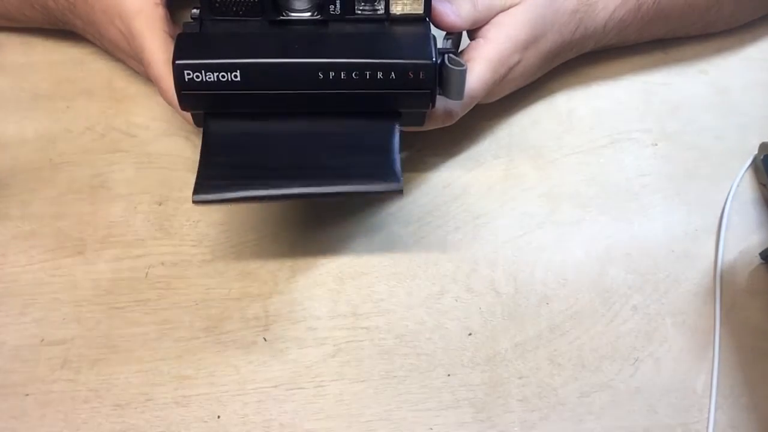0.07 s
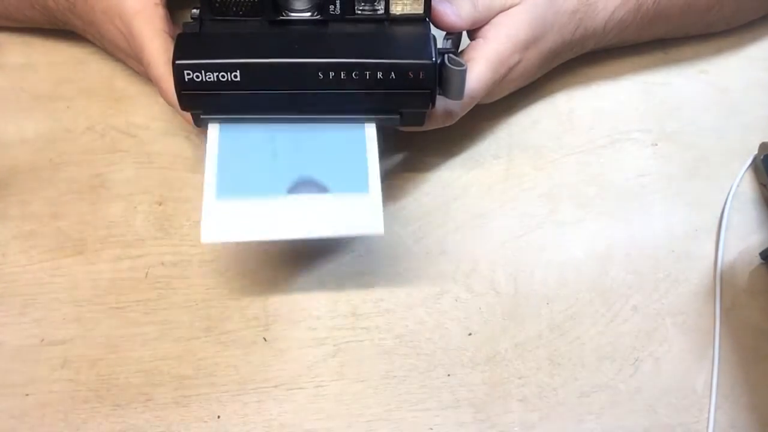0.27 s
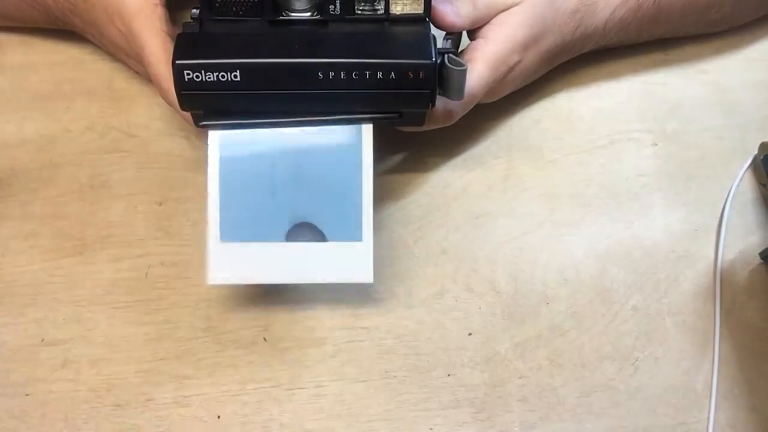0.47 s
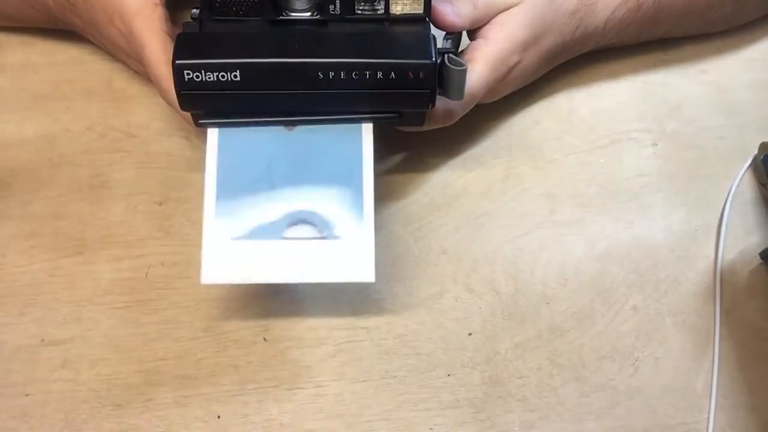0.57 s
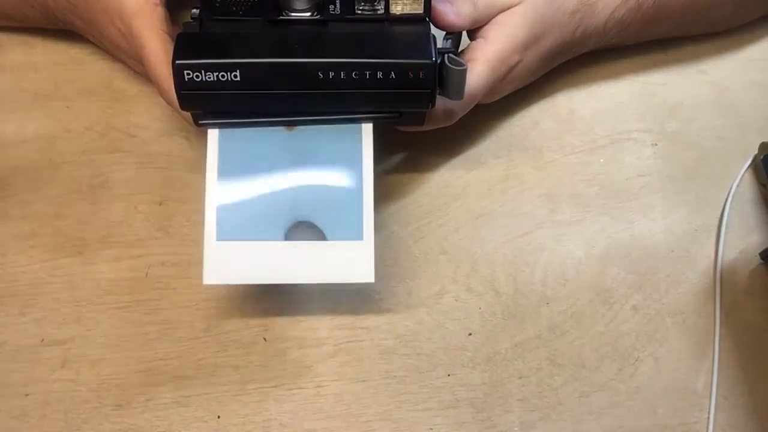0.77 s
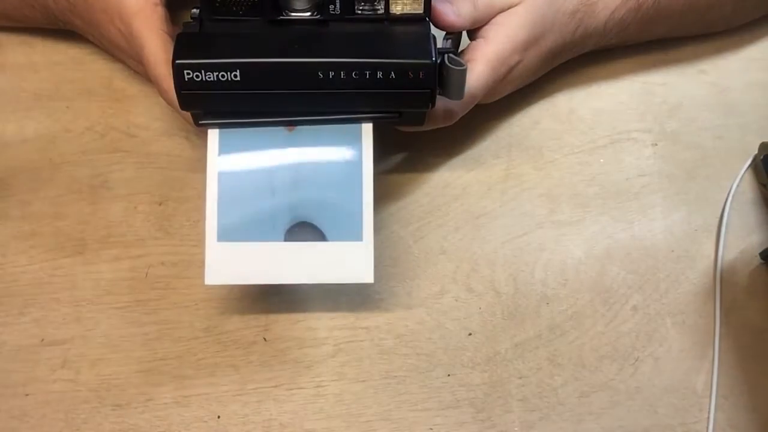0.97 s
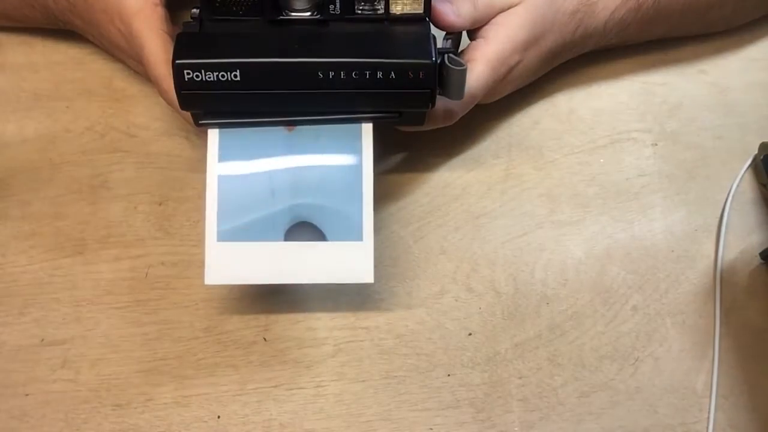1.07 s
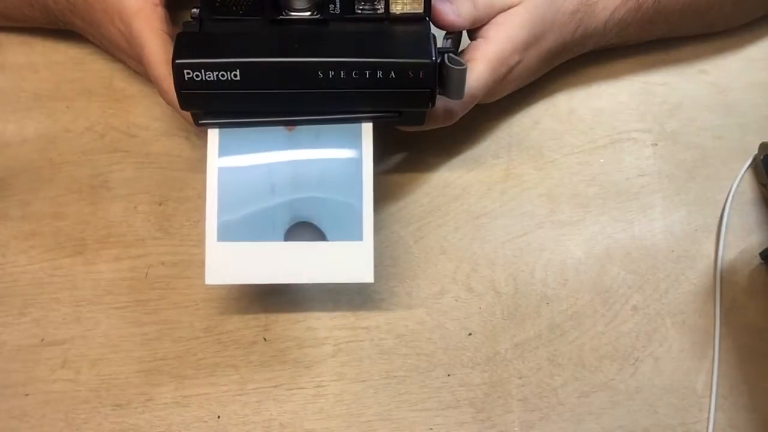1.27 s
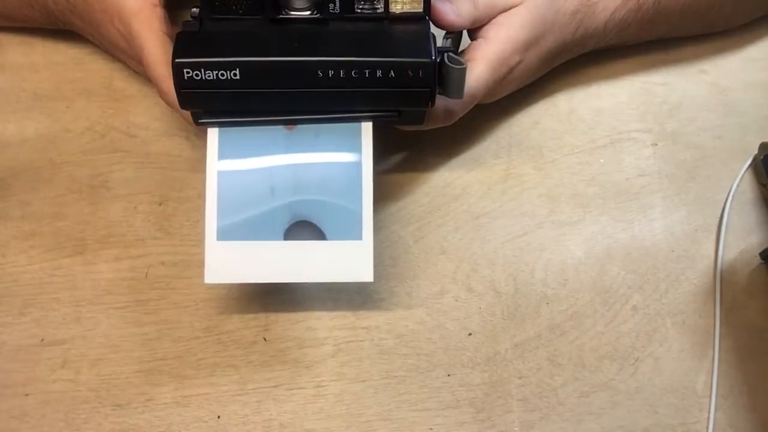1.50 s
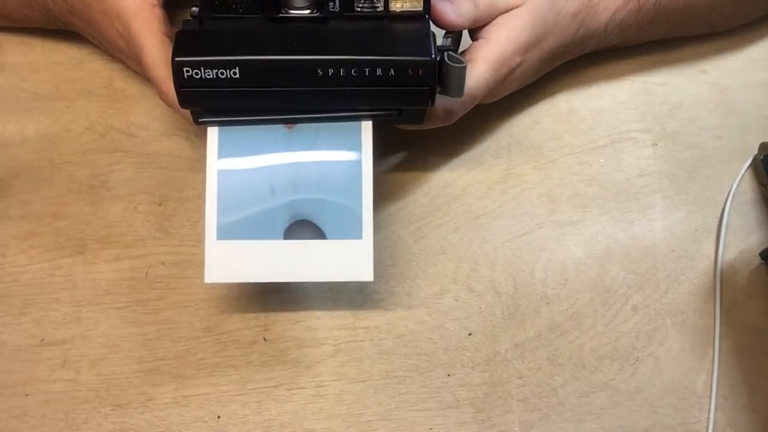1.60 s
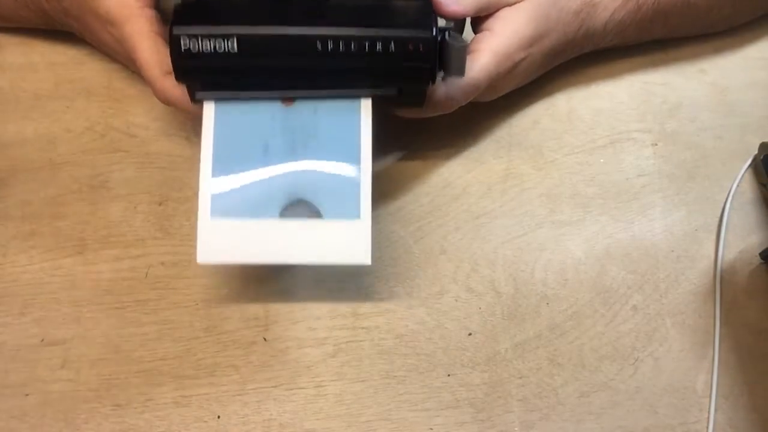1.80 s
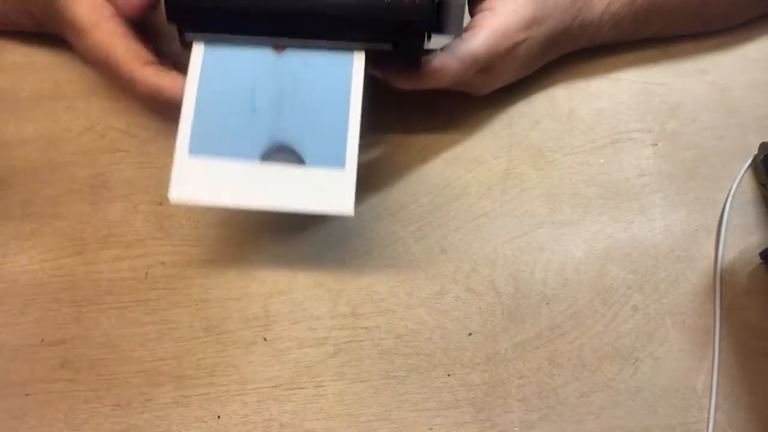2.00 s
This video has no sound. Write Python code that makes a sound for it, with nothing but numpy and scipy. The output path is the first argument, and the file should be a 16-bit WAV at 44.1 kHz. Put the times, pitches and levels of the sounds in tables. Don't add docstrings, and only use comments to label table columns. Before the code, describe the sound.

Instant camera ejecting a print: gritty gear whir, sharp plastic snap, lighter rattle, quick stop

```python
import sys
import numpy as np
from scipy import signal
from scipy.fft import rfft, irfft
from scipy.io import wavfile
from scipy.ndimage import map_coordinates

SR = 44100
rng = np.random.default_rng(int(sys.argv[2]) if len(sys.argv) > 2 else 0)


def materialize(psi):
    bounded = np.clip(np.atleast_2d(psi).T, -1, 1)
    quanta = np.round(bounded * 32767).astype(np.int16)
    wavfile.write(sys.argv[1], SR, quanta)


def voltage_ratio(decibels):
    exponent = np.asarray(decibels, float) / 20
    return 10 ** exponent


N = 90404
TIME = np.arange(N) / SR
HOUSING_HZ = 420


def unit(x):
    return x / np.sqrt(np.mean(x ** 2) + 1e-20)


def along(points, hz):
    f, v = np.transpose(points)
    return np.interp(np.log(hz + 1), np.log(f + 1), v)


def wobble(rate):
    return map_coordinates(rng.standard_normal(int(N * rate / SR) + 4), [TIME * rate])


def coloured(x, spectrum, peaks=()):
    hz = np.fft.rfftfreq(4096, 1 / SR)
    db = along(spectrum, hz)
    for centre, width, height in peaks:
        db = db + height / (1 + (2 * (hz - centre) / width) ** 2)
    cepstrum = irfft(np.log(voltage_ratio(np.maximum(db, -90))))
    cepstrum[1:2048] *= 2
    cepstrum[2049:] = 0
    response = irfft(np.exp(rfft(cepstrum)))
    return signal.fftconvolve(x, response / np.linalg.norm(response))[:len(x)]


def add(out, s, x):
    start = round(s * SR)
    out[start:][:len(x)] += x[:len(out) - start]


def sine(hz, t):
    return np.sin(2 * np.pi * hz * t)


def chatter(spiky_db, lumpy_db, rate):
    return unit(rng.standard_normal(N) * voltage_ratio(spiky_db * wobble(2500) + lumpy_db * wobble(rate)))


def order_tones(orders, turns, rough):
    out = np.zeros(N)
    for multiple, db in orders:
        level = np.sqrt(2) * voltage_ratio(db + 4 * rough * wobble(18))
        out += level * np.sin(2 * np.pi * multiple * turns + rough * wobble(40))
    return out


def loaded_grind(speed, turns):
    # centre in Hz, dB per Hz
    grind = [(160, -50), (280, -19), (524, -9), (653, -18), (1070, -6), (2060, -13), (3730, -12.5),
             (9310, -13.5), (16000, -23)]
    # centre in Hz, width in Hz, height in dB
    shell = [(1180, 250, 3.5), (1640, 99, 7.5), (3660, 220, 7.5), (5100, 150, 2), (6400, 250, 7),
             (8640, 200, 1.5)]
    # multiple of gear speed, dB over the grind
    orders = [(5, -33), (10, -20), (14, -13), (15, -17), (20, -17), (28, -9), (32, -13), (34.5, -15),
              (41, -14), (45, -16)]
    # multiple of gear speed, dB over the grind
    mesh_orders = [(102, -9.5), (136, -14), (170, -18)]
    in_tune = np.exp(-((speed - 37) / 2.3) ** 2)
    whine = in_tune * order_tones(mesh_orders, turns, .9) * voltage_ratio(3 * wobble(110))
    teeth = coloured(chatter(spiky_db=2, lumpy_db=1.2, rate=150), grind, shell)
    return teeth + (1 + in_tune) / 2 * order_tones(orders, turns, .5) + whine


def free_rattle(speed, turns):
    # centre in Hz, dB per Hz
    rattle = [(150, -59.5), (290, -20.5), (400, -15.5), (800, -12.5), (2300, -15.5), (4400, -14.5),
              (9600, -11.5), (16000, -22)]
    # centre in Hz, width in Hz, height in dB
    shell = [(885, 67, 4.5), (1075, 47, 7), (1280, 51, 4), (1400, 1500, 11), (1890, 83, 8.1),
             (2854, 410, 12), (3316, 570, 5), (3720, 130, 10), (5336, 300, 3), (6647, 1500, 6)]
    # multiple of gear speed, dB over the rattle at top speed
    orders = [(19.6, -9), (23.2, -12), (27, -16), (30, -13), (35, -14), (40, -10), (60, -17), (67, -16),
              (80, -18)]
    hum_order, hum_db = 10, -30
    detune_hz = hum_order * speed - HOUSING_HZ
    resonance_db = 18 / (1 + (2 * detune_hz / 105) ** 4)
    brake_db = 6 * np.clip((TIME - .603) / .01, 0, 1)
    hum = voltage_ratio(brake_db + resonance_db) * order_tones([(hum_order, hum_db)], turns, .5)
    teeth = coloured(chatter(spiky_db=2.2, lumpy_db=1.6, rate=90), rattle, shell)
    fade_db = 1.7 * (speed - 48)
    return teeth + voltage_ratio(fade_db) * order_tones(orders, turns, 1.3) + hum


def gears():
    # time in seconds, loaded grind in dB, free rattle in dB
    motor = [(0, -40.5, -59.5), (0.198, -39.5, -61), (0.269, -38.5, -52.5), (.35, -36, -52),
             (0.412, -42, -50.5), (0.445, -43.5, -47), (0.467, -43, -39), (.485, -49.5, -37.5),
             (.51, -55, -41.5), (0.555, -47, -36.5), (0.609, -52, -37), (.65, -59, -38.5), (.7, -61, -40),
             (.755, -59, -47), (0.775, -55, -53), (.79, -103, -62), (.86, -120, -100)]
    # time in seconds, gear speed in turns/s
    speed_points = [(0, 35.3), (.055, 36.9), (.19, 37.2), (.27, 40), (.34, 42.5), (.47, 41.5), (.5, 42.8),
                    (.53, 45.7), (.6, 48), (.62, 45.8), (.645, 40.4), (.67, 38.3), (.75, 35.6), (.8, 34.5)]
    s, *levels = np.transpose(motor)
    grind_db, rattle_db = (np.interp(TIME, s, level) for level in levels)
    speed = np.interp(TIME, *np.transpose(speed_points))
    turns = np.cumsum(speed) / SR
    return voltage_ratio(grind_db) * loaded_grind(speed, turns) + voltage_ratio(rattle_db) * free_rattle(speed, turns)


def ticks():
    tick_s = [.0125, .04, .0675, .0945, .1218, .1488, .1757, .2021, .2538, .2792, .3042, .3987, .4246,
              .7585]
    tick_db = [-32.5, -25.5, -24.5, -28, -28, -27.5, -26.5, -28, -27, -27, -26, -29.5, -35, -58]
    # pitch in Hz, level in dB, 60 dB decay in seconds
    tick_ring = [(6530, -9, 0.042), (9307, -1, 0.014)]
    crack_spectrum = [(2000, -25.5), (7000, -6.5), (10000, -1), (14000, -2.5), (16000, -10.5)]  # (Hz, dB)
    out, t = np.zeros(N), TIME[:SR // 20]
    for s, db in zip(tick_s, tick_db):
        ring = sum(voltage_ratio(d + rng.normal(0, 2.7) - 60 * t / t60) * sine(hz, t) for hz, d, t60 in tick_ring)
        crack = coloured(rng.standard_normal(len(t)) * voltage_ratio(-60 * t / .0078), crack_spectrum)
        add(out, s, voltage_ratio(db - 5.5) * (ring + crack))
    return out


def shield():
    snap_s = [.2283, .2575, .2625, .3155, .3247, .3268, .3295, .333, .34, .4572, .472]
    # level in dB, rattle length in seconds, dullness from 0 to 1
    snaps = [(-22.5, .004, .1), (-21, 0.0047, .85), (-24.5, .004, .8), (-25, 0.017, .6), (-23.5, .002, .7),
             (-13.5, 0.0026, 0.4), (-13.5, .0035, 0.6), (-20.5, .003, .5), (-30.5, .007, .6),
             (-30.5, 0.0038, 0.5), (-35, 0.0053, 1)]
    # centre in Hz, dB per Hz
    dull = [(60, -58), (100, -25), (400, -11.5), (1300, -6.5), (4700, -11), (11400, -16), (16000, -22.5)]
    # centre in Hz, width in Hz, height in dB
    first_slip = [(1200, 300, 5), (2200, 1500, -5), (4100, 400, 4.5), (5350, 250, 12), (8000, 500, 8.5),
                  (14500, 3000, -5)]
    # centre in Hz, width in Hz, height in dB
    slipping = [(450, 900, -17), (1160, 150, 10), (1900, 130, 10), (2340, 86, 8), (2620, 56, 6.5),
                (3700, 450, 7.5), (4740, 200, 6), (5390, 220, 7.5)]
    # centre in Hz, width in Hz, height in dB
    rolling_home = [(1650, 210, 10.5), (2200, 200, 5), (3470, 200, 10.5), (4020, 150, 6.5), (4450, 230, 7),
                    (5240, 240, 6), (6700, 350, 7.5), (7900, 380, 5.5)]
    out, t = np.zeros(N), TIME[:SR // 10]
    for s, (db, length, dullness) in zip(snap_s, snaps):
        contacts = rng.standard_normal(len(t) + 1) * voltage_ratio(3 * wobble(1500)[:len(t) + 1])
        contacts = dullness * contacts[1:] + (1 - dullness) * np.diff(contacts)
        shape = voltage_ratio(db - 5 * t / length - 60 * np.maximum(t - length, 0) / .014)
        shape = shape * np.minimum(t / (length / 8), 1)
        if s < .24:
            peaks = first_slip
        elif s < .3:
            peaks = slipping
        else:
            peaks = rolling_home
        snap = coloured(contacts * shape, dull, peaks)
        snap = snap * np.linalg.norm(shape) / np.linalg.norm(snap)
        thud = voltage_ratio(db - 36 - 60 * t / .13) * sine(92, t)
        add(out, s, snap + thud)
    return out


def knocks():
    # start in seconds, level in dB
    slip_knocks = [
        (.2577, -18),
        (.2592, -19),
        (.2632, -23),
    ]
    # start in seconds, level in dB
    home_knocks = [
        (.3247, -25),
        (.3273, -13.5),
        (.3299, -15),
        (.3316, -18.5),
        (.3345, -25),
        (.4575, -41),
    ]
    # pitch in Hz, level in dB, 60 dB decay in seconds
    slip_modes = [(1160, -6, .018), (1410, -4, .015), (1900, -2, .02), (2336, -5, .022), (2645, -5, .022),
                  (3150, -8, .014), (3750, -3, .016), (3910, -5, .016), (4745, -4, .016), (5600, -9, .016),
                  (7660, -11, .014)]
    # pitch in Hz, level in dB, 60 dB decay in seconds
    home_modes = [(1656, -7, .03), (2113, -10, .02), (2350, -11, .02), (3448, -4, .022), (4019, -4, .022),
                  (4441, 0, .012), (4750, -6, .012), (5278, -6, .018), (6540, -9, .02), (6711, -9, .02),
                  (7308, -9, .018), (8040, -11, .018), (10600, -10, .008), (12500, -9, .007)]
    out, t = np.zeros(N), TIME[:SR // 20]
    for hits, modes in ((slip_knocks, slip_modes), (home_knocks, home_modes)):
        for s, db in hits:
            ring = np.zeros(len(t))
            for hz, mode_db, t60 in modes:
                decay = voltage_ratio(mode_db + rng.normal(0, 2) - 60 * t / t60)
                ring += decay * np.sin(2 * np.pi * hz * t + rng.normal(0, .6))
            add(out, s, voltage_ratio(db) * ring * np.minimum(t / .0004, 1))
    return out


def spring():
    # start in seconds, spring level in dB, housing level in dB
    plucks = [
        (.328, -59.5, -34.5),
        (0.459, -71, -39),
        (0.646, -52.5, -57),
    ]
    spring_hz = 398
    out = np.zeros(N)
    rise = 1 - np.exp(-TIME / .006)
    for s, lasting_db, quick_db in plucks:
        add(out, s, rise * voltage_ratio(lasting_db - 60 * TIME / 1.4) * sine(spring_hz, TIME + s))
        add(out, s, rise * voltage_ratio(quick_db - 60 * TIME / .2) * sine(HOUSING_HZ, TIME))
    return out


def finger_taps():
    # start in seconds, peak level in dB, centre in Hz, 60 dB decay in seconds
    taps = [(.938, -66, 8000, .01), (1.036, -66.5, 11990, .01), (1.1, -70, 1700, .03),
            (1.434, -59, 1000, 0.024), (1.441, -63, 700, .03), (1.594, -67, 805, .02),
            (1.686, -64, 1400, .03), (1.763, -59, 3295, 0.016), (1.766, -58.5, 220, 0.048),
            (1.8, -57.5, 1400, 0.014), (1.856, -53, 1280, 0.033), (1.917, -56, 600, 0.029),
            (1.92, -55.5, 1500, 0.033), (1.937, -60, 1600, 0.027), (1.975, -63.5, 1800, .02)]
    # centre in Hz, width in Hz, height in dB
    body = [(410, 136, 17.5), (922, 130, 10), (1430, 94, -4), (1680, 180, 6.5)]
    out, t = np.zeros(N), TIME[:SR // 8]
    for s, db, hz, t60 in taps:
        spectrum = [(hz / 5, -22), (hz / 2, -4), (hz, 0), (hz * 1.5, -4), (hz * 2.3, -18), (hz * 4, -40)]
        puff = coloured(rng.standard_normal(len(t)) * voltage_ratio(-60 * t / t60), spectrum, body)
        add(out, s, voltage_ratio(db) * puff / np.abs(puff).max())
    return out


def creaks():
    # start in seconds, length in seconds, level in dB
    creak_events = [
        (1.468, 0.018, -79),
        (1.69, .11, -79),
        (1.92, 0.038, -75.5),
    ]
    out, t = np.zeros(N), TIME[:SR // 8]
    for s, length, db in creak_events:
        swell = np.sin(np.pi * np.clip(t / length, 0, 1)) ** .5
        slips = rng.standard_normal(len(t)) * voltage_ratio(1.9 * wobble(300)[:len(t)]) * swell
        add(out, s, voltage_ratio(db) * coloured(slips, [(100, -10), (3000, 0), (16000, -30)], [(2620, 450, 18)]))
    return out


def arm_bumps():
    # start in seconds, level in dB, pitch in Hz
    bumps = [
        (1.09, -54, 54.5),
        (1.5, -50, 58.4),
        (1.761, -54.5, 121.5),
        (1.907, -54.5, 71),
    ]
    out, t = np.zeros(N), TIME[:SR // 8]
    for s, db, hz in bumps:
        add(out, s, voltage_ratio(db - 60 * t / .16) * (1 - np.exp(-t / .0093)) * sine(hz, t))
    return out


def skin_rub():
    # time in seconds, level in dB
    rub = [(1.4, -100), (1.5, -92), (1.66, -86.5), (1.75, -73.5), (1.83, -74), (1.93, -69), (1.99, -70.5),
           (2.05, -72)]
    # centre in Hz, dB per Hz
    skin = [(180, -50), (300, -21), (348, -10), (565, -15), (1230, -5), (3000, -11), (6000, -19.5),
            (16000, -24.5)]
    # centre in Hz, width in Hz, height in dB
    skin_peaks = [(1050, 250, 8), (1678.5, 170, 4)]
    friction = coloured(chatter(spiky_db=.5, lumpy_db=1.5, rate=80), skin, skin_peaks)
    return voltage_ratio(np.interp(TIME, *np.transpose(rub))) * friction


def hands():
    return finger_taps() + creaks() + arm_bumps() + skin_rub()


def room(x):
    # frequency in Hz, 60 dB decay in seconds
    decay = [(300, .5), (1000, 0.4), (6000, .25), (14000, .15)]
    hz, t, z = signal.stft(rng.standard_normal(SR // 2), SR, nperseg=256)
    tail = signal.istft(z * voltage_ratio(-60 * t / along(decay, hz)[:, None]), SR, nperseg=256)[1]
    delayed = np.pad(x, (200, 0))
    return signal.fftconvolve(delayed, tail / np.linalg.norm(tail))[:N]


def quiet():
    # frequency in Hz, dB per Hz
    rumble_spectrum = [(12, -52.5), (20, -24.5), (35, -9), (54, 2.5), (81, -2), (115, -5), (200, -22.5),
                       (260, -45.5), (440, -120)]
    # frequency in Hz, dB per Hz
    hiss_spectrum = [(88, -38.5), (150, -10), (400, -16), (1200, -23), (2500, -29.5), (12000, -33.5),
                     (14500, -38), (16000, -39.5)]
    rumble = unit(coloured(rng.standard_normal(N), rumble_spectrum) * voltage_ratio(3 * wobble(11)))
    hiss = coloured(rng.standard_normal(N), hiss_spectrum)
    return voltage_ratio(-68.5) * rumble + voltage_ratio(-76 + .8 * wobble(2.6)) * hiss


def scene():
    near = gears() + ticks() + shield() + knocks() + hands()
    return (near + voltage_ratio(-19.5) * room(near) + spring() + quiet())[None]


def roll_off(x):
    return signal.sosfilt(signal.butter(12, 16490, fs=SR, output="sos"), x)


def record(dry):
    hz = np.fft.rfftfreq(N, 1 / SR)

    def below(edge_hz):
        return np.sin(np.pi / 2 * np.clip((edge_hz - hz) / 200, 0, 1)) ** 2

    band = (below(15850) + voltage_ratio(-34)) * below(16450)
    return roll_off(irfft(rfft(dry) * band, N))


dry = scene()
out = record(dry)
materialize(out)
```